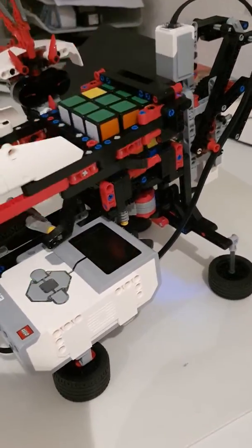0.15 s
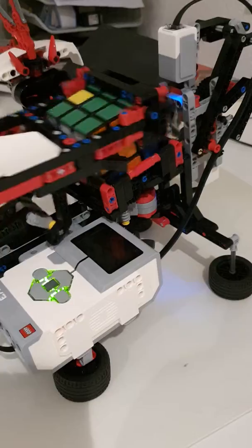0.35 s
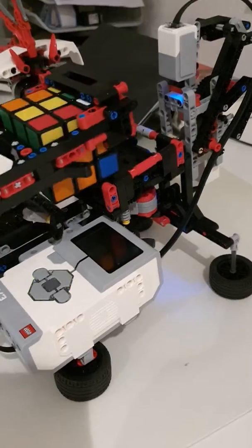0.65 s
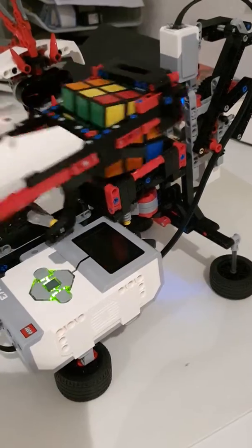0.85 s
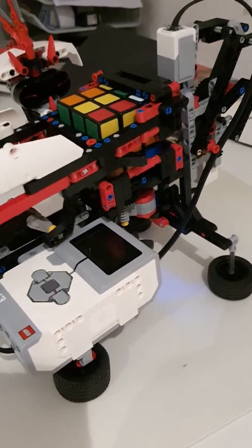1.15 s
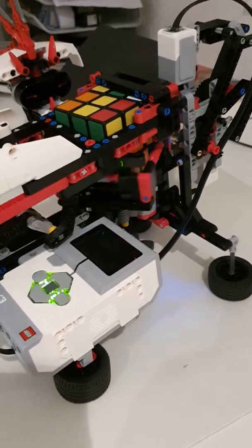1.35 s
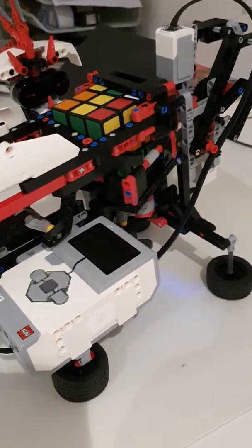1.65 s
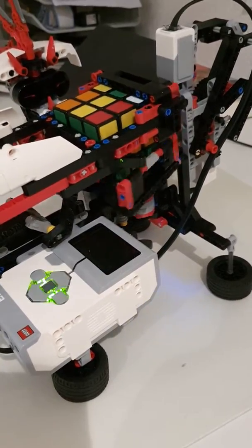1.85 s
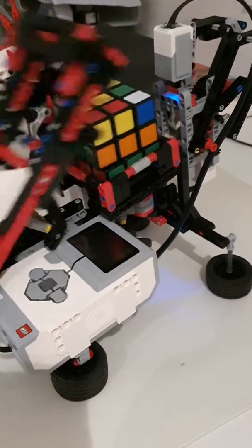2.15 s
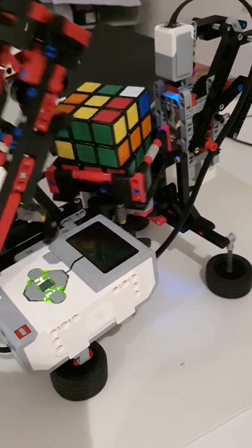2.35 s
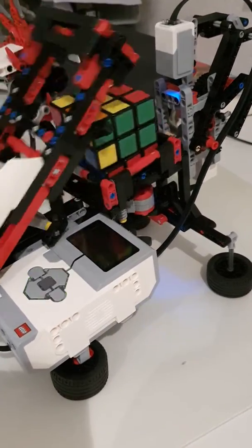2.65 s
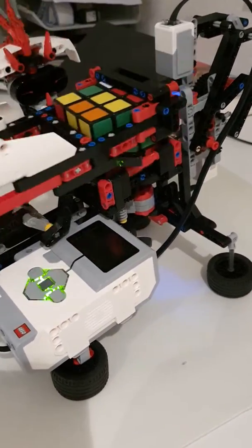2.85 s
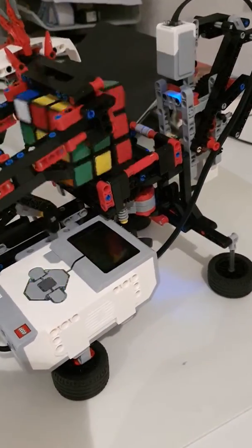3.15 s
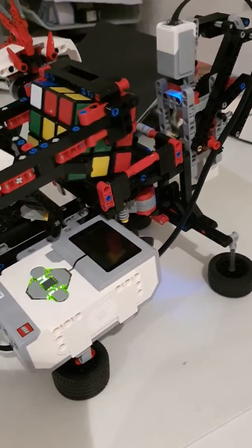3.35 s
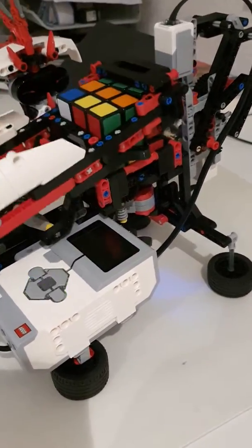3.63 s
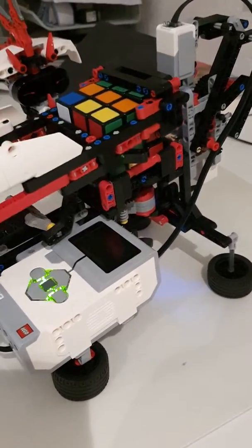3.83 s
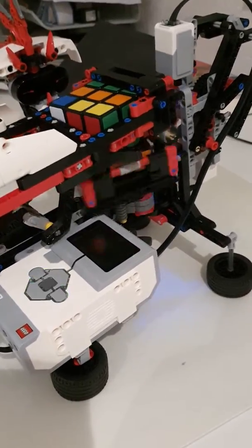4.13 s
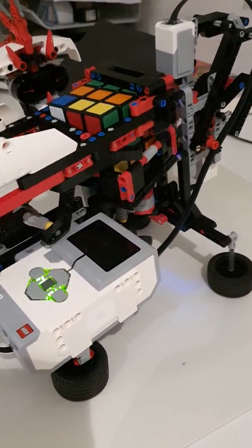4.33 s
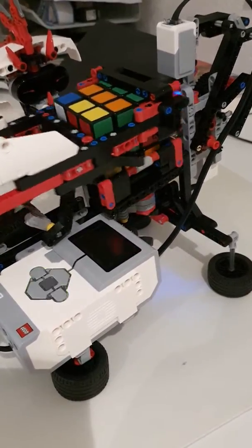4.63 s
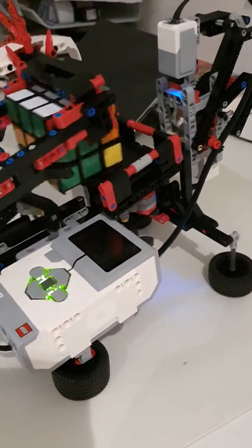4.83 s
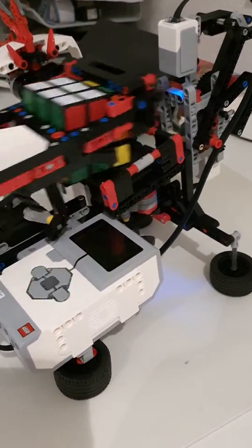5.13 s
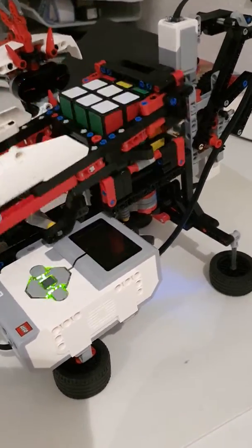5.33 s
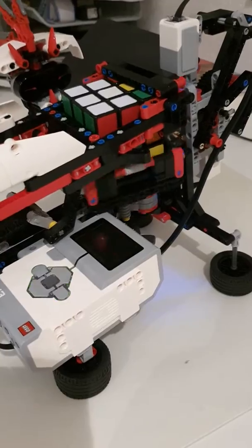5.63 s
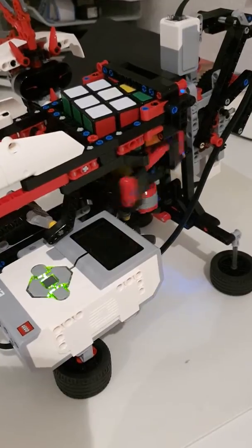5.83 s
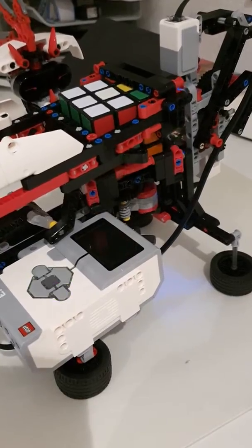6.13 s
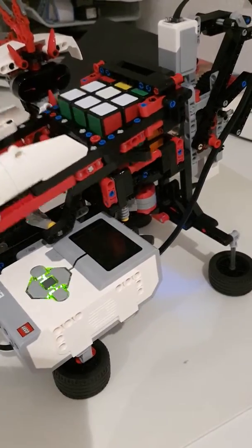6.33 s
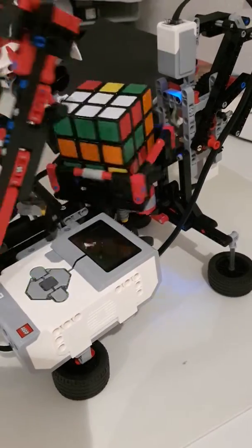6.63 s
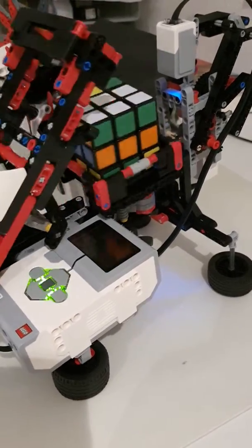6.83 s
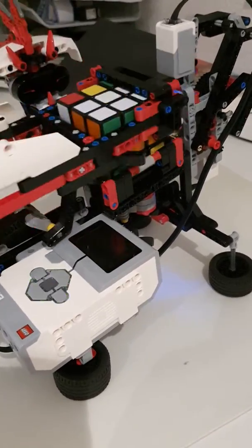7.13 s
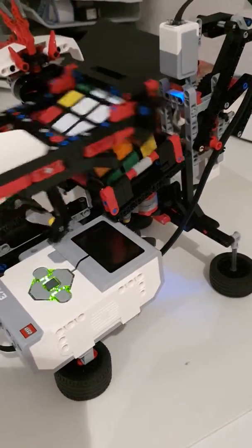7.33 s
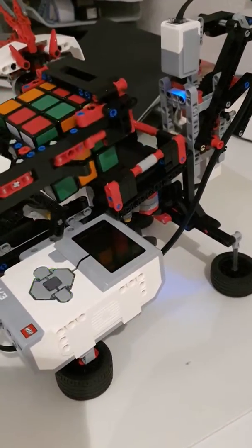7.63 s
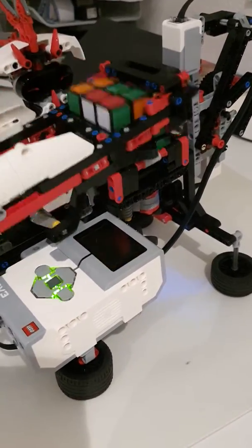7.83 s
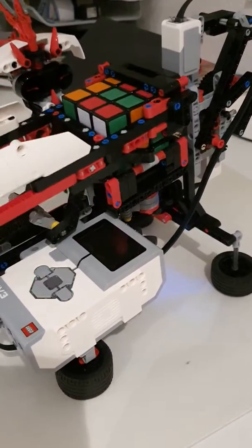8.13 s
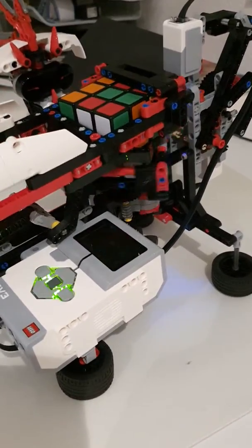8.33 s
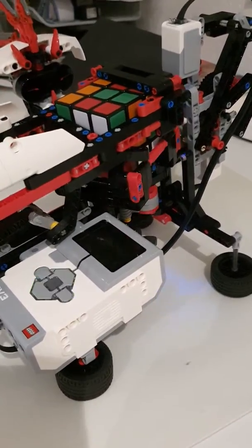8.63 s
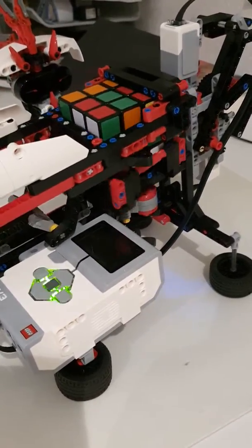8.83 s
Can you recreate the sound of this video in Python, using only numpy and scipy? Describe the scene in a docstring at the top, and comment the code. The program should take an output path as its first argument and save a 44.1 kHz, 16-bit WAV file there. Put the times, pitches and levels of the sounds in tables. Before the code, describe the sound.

Close, dry stereo phone pickup, stronger on the left: small electric gear motors buzz and whine in bursts, starting fast and stopping abruptly. The coarse swinging arm gives rattling strokes of about a fifth of a second; the turntable gives finer, steadier whirs up to nearly half a second. The cube clatters and scrapes after the strokes, with dull table thumps and small quiet gaps.

```python
"""A plastic toy robot works a puzzle cube on a table: geared motors spin a turntable and swing an arm.
Each motor layers tooth-strike noise, a once-per-turn buzz and whining mesh tones, coloured by the frame.
The cube scrapes and clacks in shaped noise bursts; hollow knocks and a faint hum follow hard jolts.
Below lie table rumble, a small room's noise tail and quiet air, heard on a close phone's two ports."""
import sys
import numpy as np
from scipy import signal
from scipy.fft import rfft, irfft, next_fast_len
from scipy.io import wavfile
from scipy.ndimage import map_coordinates

SR = 44100
rng = np.random.default_rng(int(sys.argv[2]) if len(sys.argv) > 2 else 0)


def int16_out(signal):
    """Quantize to a 16-bit WAV file."""
    q = np.round(np.clip(np.atleast_2d(signal).T, -1, 1) * 32767)
    wavfile.write(sys.argv[1], SR, q.astype(np.int16))


N = 396018

# turntable moves and arm strokes: start t/s, slack until the teeth bite t/s, braking t/s,
# full-speed tooth rate f/Hz, whine level/dB, gear level/dB, rumble level/dB
TURNTABLE_MOVES = [(1.2, 0, 1.624, 1177, 0, -35.5, -51), (1.81, 0.0, 1.898, 1102, -4.0, -33.5, -50),
                   (2.22, 0.0052, 2.545, 1205.0, -7.0, -35, -47), (3.82, 0.029, 4.226, 1174, 0, -33.5, -49),
                   (4.428, 0.0033, 4.52, 1101, -4.0, -36, -55.0), (5.495, 0.05, 5.92, 1207, 0, -31, -47.5),
                   (6.13, 0.0002, 6.207, 1099, -3.0, -35.5, -44.5),
                   (6.48, 0.027, 6.85, 1212, -7.0, -35, -53.0), (8.1, 0.059, 8.51, 1174, 0, -33.5, -48),
                   (8.737, 0.0034, 8.82, 1103, -5, -33, -51)]
ARM_STROKES = [(-0.05, 0.037, 0.1, 930.5, -8.0, -30.1, -44.5), (0.255, 0.03, 0.45, 908.5, -0.5, -32.5, -44),
               (0.72, 0.013, 0.93, 971, -2, -33.5, -45), (1.98, 0.037, 2.187, 954, -1, -33.0, -48),
               (2.63, 0.001, 2.82, 900.4, -4, -33.5, -48), (2.92, 0.034, 3.13, 865.3, -1, -32.5, -42),
               (3.37, 0.02, 3.603, 958, -4, -33.5, -43), (4.61, 0.013, 4.77, 967, 2, -32, -45.5),
               (5.02, 0.043, 5.291, 851, -2, -33.0, -47), (6.28, 0.03, 6.478, 950.5, -2.0, -35, -46.3),
               (6.93, 0.0019, 7.14, 891.3, -6.0, -34, -49), (7.24, 0.014, 7.42, 957, 1, -31, -40.5),
               (7.655, 0.031, 7.884, 855.0, -5.0, -32.5, -47.5),
               (8.94, 0.007, 9.1, 951, -4.0, -35.5, -58.2)]
# tones of each motor: multiple of rotor speed, level/dB
TURNTABLE_TONES = [(10, -1), (16, -6), (20, 0), (22, -8), (30, -6), (32, -4), (50, -8)]
ARM_TONES = [(10, -15), (20, 0), (30, -8), (38, -10), (40, -4), (50, -13)]
# resonances of the motor housing: f/Hz, width f/Hz, boost level/dB
HOUSING_RESONANCES = [(1595, 80, 7), (1870, 90, 2), (2320, 57, 3.5)]
# colour of the turntable gears, of the arm and of the clacks: f/Hz, relative level/dB
TURNTABLE_COLOUR = [(150, -53), (250, -31), (672, -15), (772, -16.5), (1150, -10), (1550, -2.5),
                    (1840, -2.5), (2000, -9), (2340, -7.5), (2740, -8), (3620, 1.5), (4610, -8.5),
                    (5880, -0.5), (7490, -18), (10600, -10), (15800, -24)]
ARM_COLOUR = [(130, -39), (220, -15.5), (288, -29), (338, -14.5), (841, -9), (1040, -9), (1820, -1),
              (2210, -4.5), (4680, 0), (6120, -3.5), (7590, -21), (9240, -8), (11000, -12), (15800, -22.5)]
CLACK_COLOUR = [(180, -38), (300, -22), (867, -4), (1310, -2.5), (1680, -0.5), (2550, -4.5), (3730, 1.5),
                (5840, 0.5), (6560, -1.5), (7620, -15.5), (10600, -6.5), (15800, -10.5)]
# the cube scrapes along the arm and its cradle: start t/s, length t/s, level/dB
SCRAPE_EVENTS = [(0.518, 0.18, -44.1), (0.826, 0.078, -35.5), (0.987, 0.045, -38), (2.429, 0.035, -36.5),
                 (2.702, 0.03, -31.5), (3.214, 0.076, -43), (3.647, 0.048, -38.5), (4.881, 0.09, -38.5),
                 (5.322, 0.051, -36.5), (6.387, 0.035, -35), (6.726, 0.054, -36), (6.985, 0.033, -29.5),
                 (7.509, 0.082, -40.5), (7.95, 0.037, -38)]
# cube and beams strike: t/s, relative level/dB
CLACK_EVENTS = [(0.0463, -12.5), (0.0956, -10), (0.271, -41), (0.2932, -37), (0.4755, -19.5),
                (0.6582, -16.8), (0.8847, -15.7), (1.0091, -23), (1.189, -33), (2.143, -20), (2.4194, -10),
                (2.4431, -17), (2.579, -22.5), (2.7213, -11.5), (2.783, -10), (3.1998, -21.5),
                (3.285, -26.0), (3.473, -15), (3.5506, -16), (3.6611, -26.5), (3.868, -32), (4.8079, -16.5),
                (4.8346, -16.5), (4.9036, -22), (4.9643, -15.5), (5.1641, -15.5), (5.2325, -16),
                (5.3085, -17.1), (6.1307, -39.9), (6.7197, -8), (6.8876, -24.4), (6.982, -17.5),
                (7.0238, -12.5), (7.0819, -10.5), (7.0914, -13.2), (7.248, -32.8), (7.4599, -16.5),
                (7.5352, -20.2), (7.5774, -15), (7.8053, -19), (7.859, -12), (7.9766, -20.1),
                (8.1424, -34.5)]
# hard jolts of cube and frame: t/s, thud level/dB, hum level/dB
JOLT_EVENTS = [(.0955, -46, -62.5), (2.419, -25.5, -55.5), (6.718, -28.5, -55.5)]
# ring of the hollow cube: f/Hz, level/dB, 60 dB decay t/s
CUBE_MODES = [(643, -16, 0.079), (876, 0, 0.072), (994, -16, 0.055), (1100, -16, 0.055)]
# low lingering hum: f/Hz, level/dB
HUM_TONES = [(284, -4.5), (312, -7), (352, -12), (442, -10), (538, -8)]
# weight shifts and the frame thumps on the table: t/s, level/dB
THUMP_EVENTS = [(0.078, -35.5), (0.876, -31), (1.333, -42.5), (2.184, -37.5), (2.411, -33), (2.785, -31.5),
                (3.182, -40), (3.563, -39), (3.96, -43), (5.188, -31.5), (5.292, -33.5), (5.353, -40),
                (6.486, -39), (6.715, -35), (7.081, -31.9), (7.318, -42), (7.571, -39), (7.857, -30.8),
                (7.92, -40)]
# resonances of the table top: f/Hz, relative level/dB
TABLE_COLOUR = [(13, -22), (22, -6.5), (60, 2.5), (80, 1), (103, -11.5), (145, -4.5), (188, -7),
                (241, -20.5), (286, -10), (336, -23.5), (420, -17), (550, -23), (920, -120)]
# decay of the room: f/Hz, 60 dB decay t/s
ROOM_DECAY = [(100, 0.46), (320, 0.95), (800, 0.38), (4000, 0.083), (14000, 0.1)]
# colour of the quiet air: f/Hz, relative level/dB
AIR_COLOUR = [(18, -31), (30, 4), (795, -16), (1530, 13), (2150, 5), (3640, -13), (5990, -10), (7390, -40),
              (15800, -33)]
# level of the left port over the right: f/Hz, level/dB
LEFT_OVER_RIGHT = [(60, 3.5), (92, 1), (140, 3), (210, -2.5), (330, 0.5), (500, 5), (770, 2.5), (1170, 7.5),
                   (1790, 6.5), (2740, 8), (4190, 14.5), (6410, 15), (9810, -2.5), (15000, 13.5)]
# likeness of the two ports: f/Hz, share from 0 to 1
PORT_LIKENESS = [(60, 0.83), (150, 0.96), (400, 0.68), (1000, 0.38), (3000, 0.29), (12000, 0.085)]

TEETH = 10  # teeth on each motor's pinion
TOUCH_S, SOFT_START = 0.013, 1.67  # light touch before the teeth bite; power of the rise
BRIGHTEN, EASY_DB = 1, -34.5  # treble dB per dB of gear level; level of an easy run
RADIATES_HZ = 1090  # the small housing gives off little of any tone below this
TURN_LOW_CUT_HZ = 54  # the balanced turntable shakes the table less deeply than the arm
TOP_HZ = 15900  # band limit of the phone


def drives():
    """Both motors and the scraping cube sound through the frame; harder work brightens them."""
    spin = tooth_rate(TURNTABLE_MOVES, spin_up=.085, coast=.2, flutter=.004)
    swing = tooth_rate(ARM_STROKES, spin_up=.04, coast=.12, flutter=.012)
    turning = effort(TURNTABLE_MOVES, rise=0.063, fall_db_per_s=258, coast=0.029)
    # the lighter arm starts faster; its loose linkage loads it unevenly
    swinging = effort(ARM_STROKES, rise=0.034, fall_db_per_s=172, coast=0.0051)
    swinging *= amp(1.5 * wobble(45))
    rubbing = scraping()
    gears = turning * turntable(spin) + swinging * arm(swing) + rubbing * scrape()

    load_db = 10 * np.log10(turning ** 2 + swinging ** 2 + rubbing ** 2 + 1e-12)
    treble = filtered(gears, lambda hz: 1 / (1 + (9000 / (hz + 1)) ** 4))
    treble_db = BRIGHTEN * np.clip(load_db - EASY_DB, -4, 4)
    return gears + treble * (amp(treble_db) - 1)


def turntable(rate):
    """Long even runs: a fine gear hiss under a rising whine."""
    turns = rotor_turns(rate, slop=.012)
    drive = chatter(rate, scatter_db=3.5, slide=0.8, ring=0.0061)
    drive[0] = .8 * drive[0] + .6 * buzz(turns)
    drive = frame_echoes(drive, share=.1, t60=.06)
    gears = amp(-0.5) * coloured(drive, TURNTABLE_COLOUR)
    gears[0] += amp(-10.5) * whine(rate, turns, TURNTABLE_TONES, TURNTABLE_MOVES)
    return gears


def arm(rate):
    """Short hard strokes: the loose linkage rattles over the gears."""
    t, free = clock(), np.zeros(N)
    # the motor runs free and sings out, most at 115 ms, until the arm meets the cube
    for start, *rest in ARM_STROKES:
        free += np.exp(-((t - start - .115) / .055) ** 2)
    turns = rotor_turns(rate, slop=.016)
    even = .15 + .35 * np.clip(free, 0, 1)  # power share of the regular buzz
    drive = chatter(rate, scatter_db=4.5, slide=0.59, ring=0.0096)
    drive[0] = np.sqrt(1 - even) * drive[0] + np.sqrt(even) * buzz(turns)
    drive = frame_echoes(drive, share=.08, t60=.05)
    gears = amp(-0.66 - 0.82 * free) * coloured(drive, ARM_COLOUR)
    gears[0] += amp(-16.5 + 12 * free) * whine(rate, turns, ARM_TONES, ARM_STROKES)
    return gears


def tooth_rate(moves, spin_up, coast, flutter):
    """A motor nears full speed exponentially, then brakes; friction makes it waver."""
    t, rate = clock(), np.zeros(N)
    for start, slack, brake, hz, *levels in moves:
        on = t > start
        speeding_up = 1 - np.exp(-(t[on] - start) / spin_up)
        braking = 1 + (np.maximum(t[on] - brake, 0) / coast) ** 2
        rate[on] = hz * speeding_up / braking
    return rate * (1 + flutter * wobble(60))


def effort(moves, rise, fall_db_per_s, coast):
    """Gears swell as the slack is taken up, and run down after braking."""
    start, slack, brake, hz, whine_db, gear_db, rumble_db = np.transpose(moves)
    return swells(start + slack - TOUCH_S, brake, gear_db, rise, fall_db_per_s, SOFT_START, coast)


def rotor_turns(rate, slop):
    """Turns of a rotor with a ten-tooth pinion; play in the gears jitters its angle (slop in radians)."""
    return np.cumsum(rate / TEETH) / SR + slop * wobble(170) / (2 * np.pi)


def chatter(rate, scatter_db, slide, ring):
    """Teeth strike with uneven force and leave a brief rustle; between strikes they slide."""
    strike_rate = rate + 200  # strikes/s, never quite stopping
    teeth = np.flatnonzero(np.diff(np.floor(np.cumsum(strike_rate) / SR)))
    scatter = 0.79 * wobble(200)[teeth] + 0.56 * rng.standard_normal(len(teeth))
    force_db = scatter_db * np.clip(scatter, -2, 2)
    blows = np.zeros(N)
    blows[teeth] = amp(force_db) ** 2 / strike_rate[teeth]  # energy per strike
    t = np.arange(SR // 20) / SR
    energy = np.abs(signal.fftconvolve(blows, amp(-60 * t / ring) ** 2)[:N])
    level = np.sqrt(energy / energy.mean() + slide ** 2)
    return unit(level * rng.standard_normal((2, N)))


def buzz(turns, size=380):
    """The same small flaws of the teeth come round with every turn: a dense comb of weak partials."""
    flaws = rng.standard_normal(size)
    return unit(map_coordinates(flaws, [turns % 1 * size], mode="grid-wrap"))


def whine(rate, turns, orders, moves):
    """Mesh tones swell with speed, flutter, and flare as they sweep through the housing's resonances."""
    start, slack, brake, hz, whine_db, gear_db, rumble_db = np.transpose(moves)
    move = np.maximum(np.searchsorted(start, clock()) - 1, 0)  # latest move begun
    tones = np.zeros(N)
    for k, db in orders:
        pitch = k * rate / TEETH
        flare_db = sum(gain * np.exp(-((pitch - centre) / width) ** 2)
                       for centre, width, gain in HOUSING_RESONANCES)
        radiated = 1 / np.sqrt(1 + (RADIATES_HZ / (pitch + 1)) ** 10)
        level = radiated * amp(db + flare_db + 4 * wobble(45))
        tones += level * np.sin(2 * np.pi * k * turns + .5 * wobble(120))
    return amp(whine_db[move]) * tones * (rate / rate.max()) ** 2


def frame_echoes(x, share, t60):
    """Beams pass the vibration back and forth, which makes many close resonances."""
    t = np.arange(SR // 25) / SR
    ring = rng.standard_normal((2, len(t))) * amp(-60 * t / t60)
    ring /= np.linalg.norm(ring, axis=1, keepdims=True)
    echoes = signal.fftconvolve(x, ring, axes=1)[:, :N]
    return np.sqrt(1 - share) * x + np.sqrt(share) * echoes


def scraping():
    """Strength of the cube's rubbing on the beams: it catches at once and rattles out."""
    start, length, db = np.transpose(SCRAPE_EVENTS)
    return swells(start, start + length, db, rise=0.0081, fall_db_per_s=178)


def scrape():
    """The cube's edges catch and slip on the beams and rattle the arm."""
    slips = chatter(np.full(N, 250.), scatter_db=4.5, slide=0.57, ring=0.011)
    return amp(1.0) * coloured(frame_echoes(slips, share=0.068, t60=0.071), ARM_COLOUR)


def clacks():
    """Each blow cracks, shakes loose pins for a moment and knocks the cube; jolts thud deep into it."""
    t = np.arange(SR // 6) / SR
    cracks, knocks = np.zeros((2, N + SR)), np.zeros(N + SR)
    for s, db in CLACK_EVENTS:
        at = slice(round(s * SR), round(s * SR) + len(t))
        pins = amp(2.3 * map_coordinates(rng.standard_normal(80), [t * 400]))
        shape = amp(-60 * t / 0.03) + amp(-11.5) * pins * amp(-60 * t / 0.24)
        cracks[:, at] += amp(db - 9) * shape * rng.standard_normal((2, len(t)))
        knocks[at] += amp(db - 28.5) * cube_knock(t)
    for s, thud_db, hum_db in JOLT_EVENTS:
        knocks[round(s * SR):][:len(t)] += amp(thud_db) * cube_knock(t)
    strikes = coloured(cracks[:, :N], CLACK_COLOUR)
    strikes[0] += knocks[:N]
    return strikes


def cube_knock(t):
    """The hollow cube rings briefly, at new strengths and slightly new pitches for every blow."""
    knock = np.zeros(len(t))
    for hz, db, t60 in CUBE_MODES:
        level = amp(db + rng.normal(0, 3.1) - 60 * t / t60)
        pitch = hz * (1 + rng.normal(0, 0.0077))
        knock += level * np.sin(2 * np.pi * pitch * t)
    return knock


def hum():
    """After each jolt a faint, wavering hum lingers for a second or so."""
    t = clock()
    level = sum(amp(db) * np.clip((t - s) / 0.034, 0, 1) / (1 + ((t - s) / 1.28) ** 8)
                for s, thud_db, db in JOLT_EVENTS)
    tones = sum(amp(db + 3.5 * wobble(9)) * np.sin(2 * np.pi * hz * t + 1.7 * wobble(28))
                for hz, db in HUM_TONES)
    return level * tones


def rumble():
    """Motors, scrapes and thumps rock the frame, which drives the low resonances of the table top."""
    s, db = np.transpose(THUMP_EVENTS)
    pushes = [rocking(ARM_STROKES, lag=0.018, fall_db_per_s=70),
              amp(-10) * scraping(),
              swells(s, s, db, rise=0.027, fall_db_per_s=124),
              np.full(N, amp(-77))]  # the table at rest
    spinning = rocking(TURNTABLE_MOVES, lag=0.042, fall_db_per_s=210) * table_top()
    spinning = filtered(spinning, lambda hz: 1 / np.sqrt(1 + (TURN_LOW_CUT_HZ / (hz + 1)) ** 4))
    return amp(-1.8) * (np.linalg.norm(pushes, axis=0) * table_top() + spinning)


def rocking(moves, lag, fall_db_per_s):
    """A moving motor rocks the frame, a little late."""
    start, slack, brake, hz, whine_db, gear_db, rumble_db = np.transpose(moves)
    return swells(start + slack + lag, brake + lag, rumble_db, 0.06, fall_db_per_s)


def table_top():
    """Steady noise coloured by the table's low resonances."""
    return unit(coloured(rng.standard_normal((2, N)), TABLE_COLOUR))


def room(x):
    """A noise tail, 300 samples late, in which each frequency dies at its own speed."""
    hz, t, z = signal.stft(rng.standard_normal((2, SR * 2 // 3)), SR, nperseg=256)
    decay = amp(-60 * t / along(ROOM_DECAY, hz)[:, None])
    tail = signal.istft(z * decay, SR, nperseg=256)[1]
    tail /= np.linalg.norm(tail[0])
    return signal.fftconvolve(np.pad(x, (300, 0))[None], tail, axes=1)[:, :N]


def quiet_air():
    """Faint steady coloured noise behind everything."""
    return amp(-70.0) * coloured(rng.standard_normal((2, N)), AIR_COLOUR)


def ports(pair, lag_ms):
    """The left port faces the robot; the shaded right one shares only part of its sound, slightly later."""
    def mix(hz):
        alike = np.clip(along(PORT_LIKENESS, hz), 0, .99)
        right = amp(-along(LEFT_OVER_RIGHT, hz))
        shared = right * alike * np.exp(-2j * np.pi * hz * lag_ms / 10 ** 3)
        own = right * np.sqrt(1 - alike ** 2)
        matrix = np.array([[hz * 0 + 1, hz * 0], [shared, own]])
        return matrix * 2 / np.hypot(np.abs(1 + shared), own)  # evens out the mono sum
    return filtered(pair, mix).sum(axis=1)


def swells(starts, stops, levels_db, rise, fall_db_per_s, softness=1, coast=0):
    """Each event rises to its level, holds until it stops, coasts, then dies away; overlaps add in power."""
    t, power = clock(), np.zeros(N)
    for start, stop, db in zip(starts, stops, levels_db):
        on = slice(*np.searchsorted(t, [start, stop + 1]))
        attack = (1 - np.exp((start - t[on]) / rise)) ** softness
        dying = np.hypot(np.maximum(t[on] - stop, 0), coast) - coast
        power[on] += (attack * amp(db - fall_db_per_s * dying)) ** 2
    return np.sqrt(power)


def amp(db):
    """Amplitude of a level in dB."""
    return 10 ** (np.asarray(db) / 20)


def unit(x):
    """x scaled to an RMS of one."""
    return x / np.sqrt(np.mean(x ** 2) + 1e-20)


def clock():
    """Time of every sample in seconds."""
    return np.arange(N) / SR


def along(points, hz):
    """Values between (Hz, value) points on a log frequency axis."""
    f, v = np.transpose(points)
    return np.interp(np.log(hz + 1), np.log(f + 1), v)


def wobble(rate):
    """A smooth random curve, rate knots a second."""
    knots = rng.standard_normal(int(N * rate / SR) + 4)
    return map_coordinates(knots, [np.arange(N) * rate / SR])


def filtered(x, response):
    """x times a complex response of frequency."""
    m = next_fast_len(N + SR // 2)
    return irfft(rfft(x, m) * response(np.fft.rfftfreq(m, 1 / SR)), m)[..., :N]


def coloured(x, spectrum, size=8192):
    """Causal filter with the given spectrum; white noise keeps its power."""
    gain = unit(amp(along(spectrum, np.fft.rfftfreq(size, 1 / SR))))
    cepstrum = irfft(np.log(gain + 1e-6))
    cepstrum[1:size // 2] *= 2  # folding the cepstrum gives minimum phase
    cepstrum[size // 2 + 1:] = 0
    impulse = irfft(np.exp(rfft(cepstrum)))
    return signal.fftconvolve(x, impulse[None], axes=1)[:, :N]


def scene():
    """The robot and its hum, the room's answer, the table rumble and the air meet at the two ports."""
    robot = drives() + clacks()
    robot[0] += hum()
    answer = amp(-11.5) * room(robot[0])
    return ports(robot + answer + rumble() + quiet_air(), lag_ms=.1)


def record(dry):
    """The phone keeps nothing above its band limit."""
    return filtered(dry, lambda hz: hz < TOP_HZ)


dry = scene()
out = record(dry)
int16_out(out)
```